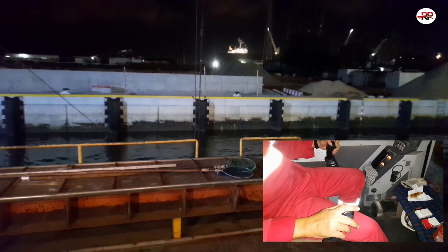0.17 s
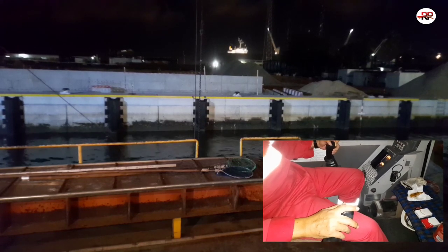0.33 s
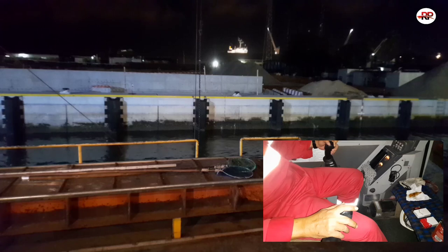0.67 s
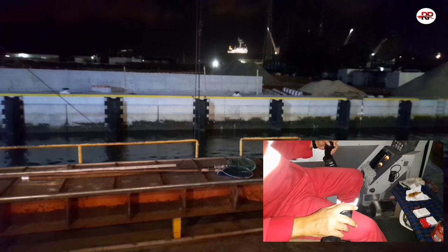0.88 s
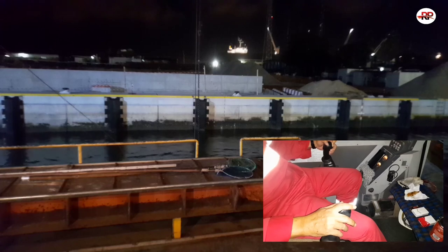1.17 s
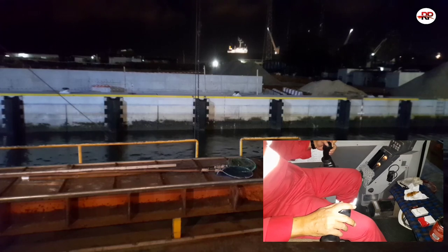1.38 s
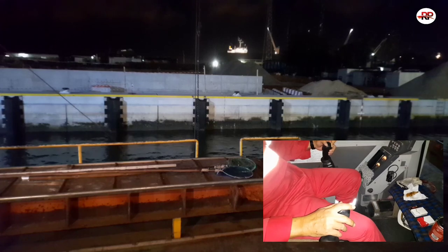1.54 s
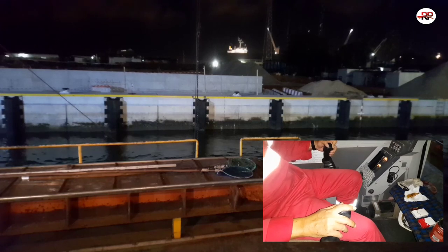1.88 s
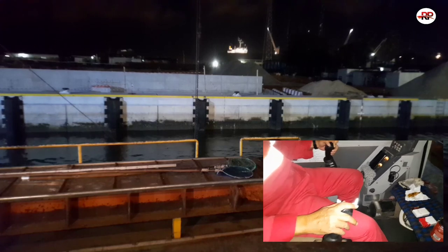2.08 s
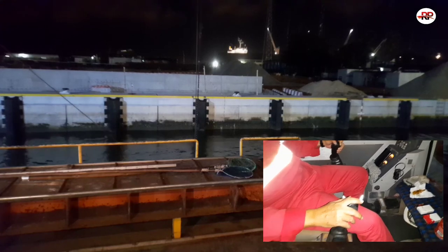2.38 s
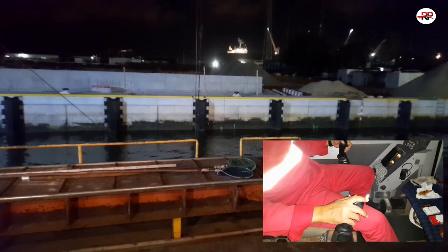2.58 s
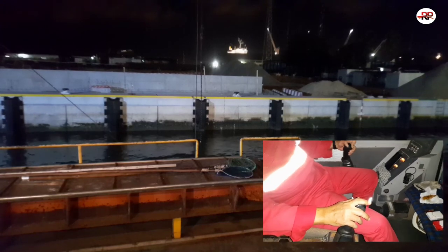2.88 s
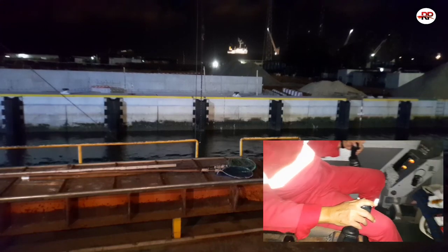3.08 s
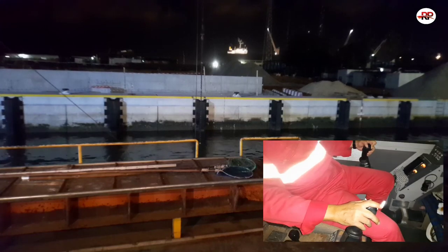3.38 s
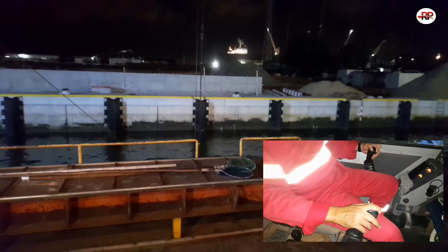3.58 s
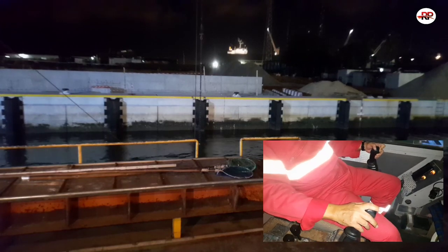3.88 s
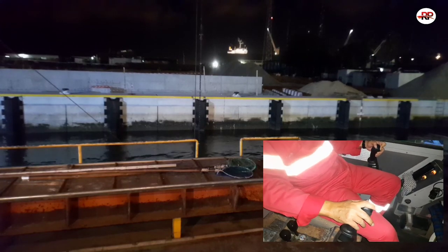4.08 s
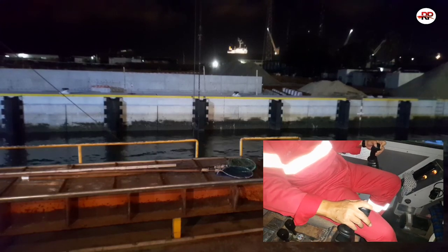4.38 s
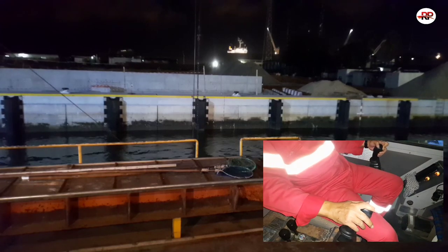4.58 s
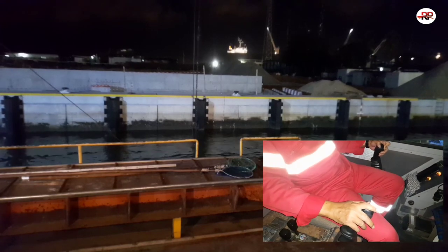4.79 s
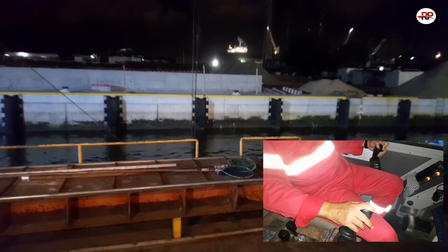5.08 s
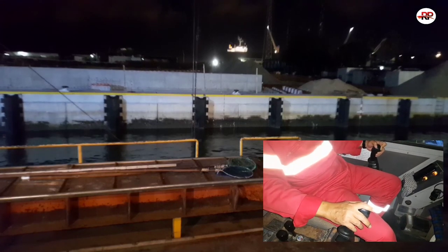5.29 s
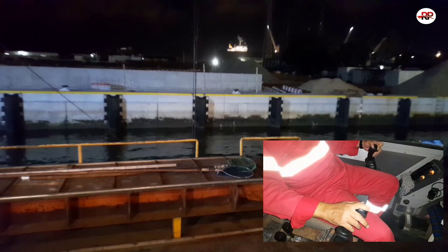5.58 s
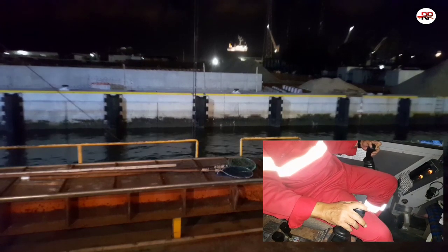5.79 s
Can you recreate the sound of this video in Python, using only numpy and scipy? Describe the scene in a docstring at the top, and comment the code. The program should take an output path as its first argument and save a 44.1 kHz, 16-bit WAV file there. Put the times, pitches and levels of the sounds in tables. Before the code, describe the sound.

Close inside a crane operator's cab, a diesel drones at constant speed with a steady mid-pitched whine above it. Low booms throb unevenly several times a second, panels hum, and faint oil hiss and light ticks come and go. After about four seconds the hydraulics take load: the drive drops in pitch, its deep throb quickens, and valves hiss, squeal and chirp to the end.

```python
"""The diesel of a dredging crane, heard from its cab, runs at governed speed: sines at orders of its cycle form
a drone. A geared pump whines over it, and a hydraulic drive and a deep hum beat with its orders; a fan adds a
thin tone. The cab booms in uneven throbs and steady tones sing in it; filtered noise gives rumble, clatter, oil
hiss and a few light ticks. Late on the load comes: the drive sinks in pitch and booms, the deep throb quickens,
and oil hisses, squeals and chirps through the valves."""
import sys
import numpy as np
from scipy import signal
from scipy.fft import rfft, irfft, next_fast_len
from scipy.io import wavfile

SR = 44100
rng = np.random.default_rng(int(sys.argv[2]) if len(sys.argv) > 2 else 0)


def dump(signal):
    """Clip the signal to [-1, 1] and save it as 16-bit WAV at the path in sys.argv[1]."""
    limited = np.clip(np.atleast_2d(signal).T, -1, 1)
    pcm = np.round(limited * 32767).astype(np.int16)
    wavfile.write(sys.argv[1], SR, pcm)


N = 261954
TIME = np.arange(N) / SR

CYCLE_HZ = 18.963   # repeat rate of the engine's drone, before the governor acts
HIGHEST_IN_STEP = 10   # multiple of the cycle; orders above it start at a random phase
LOAD_ON_S, LOAD_RISE_S = 4.33, 0.16   # the hydraulics take the load
LULL_S, LULL_HALF_S, LULL_DB = 3.28, .17, -0.5   # the deepest order of the drone dips briefly
PUMP_ORDER = 27   # multiple of the engine cycle
PUMP_DB, PUMP_LOADED_DB = -31.5, -33.5   # mean whine, running light and under load
FAN_HZ = 983.5   # mean blade rate
CLATTER_TOP_HZ = 5970
FLOW_DB, FLOW_LOADED_DB = -59, -57   # steady oil hiss, running light and under load
SNAP_S, SNAP_DB, SNAP_T60_S = 3.47, -42, .004   # the loudest tick snaps home
CUTOFF_HZ = 14500

# Engine orders. Each row: multiple of the cycle, level in dB before the drone trim,
# left-right difference in dB, left lead in rad.
ENGINE_ORDERS = [(3, -32.8, -1, 0), (4.5, -42, 3, .1), (6, -37, 0, .6), (7, -40, 0, -.2), (8, -32.5, 0, .1),
                 (9, -31, -2, 1.0), (10, -36, 1, 0), (12, -41, 8, 1.4), (14, -45, 3, -.2), (15, -48, 1, 0),
                 (17, -45, 3, -.1), (18, -40, 3, .1), (24, -51, -5, -1.3), (26, -53, 1, .6),
                 (28, -50, 0, -.6), (32, -55, 0, 0), (33, -53, -5, .2), (36, -55, 3, -.7),
                 (45, -49.5, -5, .6), (54, -56, 1, -.5), (63, -62, 1, 1.5)]
# Engine orders that change under load. Each row: multiple of the cycle, dB added.
LOADED_ORDERS = [(18, -5), (24, 5.5), (26, 10), (32, 4), (33, -2.5), (54, -6.5)]
# Speed of the hydraulic drive. Each row: time in seconds, speed in Hz before the governor acts.
DRIVE_SPEED = [(0.0, 56.08), (0.51, 55.08), (0.96, 52.57), (1.74, 55.28), (1.87, 53.6), (2.19, 56.57),
               (2.51, 52.88), (3.02, 56.15), (3.19, 52.13), (3.36, 55.64), (3.88, 52.42), (4.24, 55.28),
               (4.35, 50.1), (4.87, 49.49), (5.36, 48.97), (5.64, 47.8), (5.75, 49.9), (5.94, 49.63)]
# Its harmonics. Each row: multiple of the speed, base level in dB running light, base level in dB under load.
DRIVE_ORDERS = [(2, -28.5, -32), (3, -28.5, -21.5), (4, -38, -33), (5, -43, -35), (6, -47.5, -47),
                (7, -49, -49), (8, -65, -47.5)]
# Swell of its two booming harmonics. Each row: time in seconds, dB added to the second, dB added to the third.
DRIVE_SWELL = [(0, -5.5, 2), (.3, 6, -1), (.47, -17, -3), (.65, 6, 0.5), (.88, 0.5, -5), (1.15, 2, -14),
               (1.33, 4.5, -6), (1.55, 2.5, -7), (1.85, -1.5, -10.5), (2.2, 0.5, -2), (2.47, 4.5, -4),
               (2.62, -8, 0), (2.82, 3, 4), (2.96, 1.5, -5), (3.12, 4.5, -4), (3.6, 10, -12.5),
               (3.73, -1.5, 3), (3.88, 0.5, -3), (4.2, 3.5, -6), (4.33, 6.5, 1.5), (4.45, -2, 2.5),
               (4.56, 5, 3.5), (4.72, 8.5, 1.5), (5.1, 6.5, 2.5), (5.42, -2, -2.5), (5.68, 7, 0),
               (5.84, -5, 4), (5.94, -8, 4.5)]
# The next two take turns under load. Each row: time in seconds, dB added to the fourth, dB added to the fifth.
DRIVE_LOADED_SWELL = [(4.35, -3, -5), (4.7, -1, 6), (5.0, 7.5, -6.5), (5.11, -7, 1), (5.27, -9, 6.5),
                      (5.45, 9.5, 4), (5.58, 2.5, -12), (5.78, -3, 2.5), (5.94, -10, -3)]
# Deep hum under the engine's third order. Each row: time in seconds, pitch in Hz before the governor, level in dB.
DEEP_HUM = [(0.0, 53.8, -29), (0.55, 52.88, -36), (2.44, 52.77, -34.5), (2.59, 53.78, -29),
            (3.1, 52.27, -50), (3.75, 52.59, -35), (4.3, 55.08, -26), (4.4, 50.93, -33),
            (4.71, 50.77, -30.5), (5.48, 49.14, -28.5), (5.94, 48.8, -28.5)]
# Booms of the cab while the drive runs light. Each row: centre in seconds, pitch in Hz, level in dB,
# half length in seconds.
THROBS = [(0.154, 158.5, -16.5, 0.043), (0.285, 159, -19, 0.047), (0.447, 158.9, -14.5, 0.028),
          (0.573, 157, -24.5, 0.047), (0.839, 161.9, -19, 0.037), (0.988, 153.4, -18, 0.045),
          (1.104, 159, -16.5, 0.034), (1.226, 150.7, -21, 0.024), (1.56, 161.7, -22, 0.071),
          (1.721, 161.5, -22.5, 0.021), (1.803, 152.2, -17, 0.028), (1.879, 162.3, -23.5, 0.02),
          (2.031, 158.8, -22, 0.031), (2.22, 166.3, -19.5, 0.041), (2.333, 149.9, -21, 0.03),
          (2.42, 155.9, -23, 0.026), (2.585, 159, -16, 0.035), (2.76, 155.8, -18.5, 0.04),
          (3.01, 161, -17.5, 0.051), (3.117, 156.9, -20, 0.038), (3.37, 160.2, -24, .04),
          (3.851, 155.9, -19, 0.039), (3.991, 157.3, -20, 0.047), (4.122, 165, -25, .03)]
# Steady tones in the cab, wavering in pitch and level. Each row: mean pitch in Hz, level in dB running light,
# level in dB under load, # both before trim and swell.
CAB_TONES = [(191.9, -38, -38), (216.4, -35.5, -45.5), (245.5, -40.5, -38.5), (267.5, -38.5, -46),
             (286.3, -41, -40.5), (324.3, -42, -43), (382.3, -49, -47), (412, -59, -42.5), (826, -55.5, -54.5),
             (928, -62.5, -59), (1084, -59.5, -59), (1390, -62.5, -65), (1779, -69, -72)]
# Fan blade rate and octave. Each row: multiple, mean level in dB running light, mean level in dB under load,
# left-right difference in dB, left lead in rad.
FAN_TONES = [(1, -47.5, -47.5, -1.5, 0.051), (2, -60.5, -63.5, -11.5, 1.9)]
# Moments when a valve opens wider. Each row: centre in seconds, Gaussian spread in seconds, hiss level in dB.
RUSHES = [(.1, .08, -69), (0.653, 0.12, -62), (1.116, .08, -64), (1.8, 0.25, -65.5), (2.352, 0.17, -59.5),
          (4.69, 0.035, -59.5), (5.27, .07, -57), (5.361, .22, -59.5)]
# Narrow squeals of the valves under load. Each row: centre in Hz, width in Hz, mean level in dB against the hiss.
WHISTLES = [(1567, 270, -5.5), (2565, 180, -6.5), (2970, 170, -9.5), (3260, 190, -16), (3600, 350, -14.5),
            (4050, 400, -12), (4770, 70, -18), (5500, 350, -15.5), (6100, 300, -18)]
# Swell of the ragged squeal, strongest where the valve opens widest. Each row: time in seconds, dB before trim.
SQUEAL_SWELL = [(4.33, -90), (4.42, -67), (4.68, -64), (4.78, -67), (5.0, -65.5), (5.15, -63),
                (5.31, -55.5), (5.43, -57), (5.55, -61.5), (5.7, -64), (5.94, -68)]
# Its partials. Each row: mean pitch in Hz, level in dB against the swell.
SQUEAL_PARTIALS = [(2580, -3), (2900, -5), (3080, -6), (3290, -4), (3480, -5.5), (3700, -5), (4000, -9),
                   (4950, -12.5), (5600, -12), (5990, -12.5)]
# Squeaks, most of them under load. Each row: centre in seconds, pitch in Hz, level in dB,
# level of the octave in dB (both before trim and rasp), half length in seconds.
SQUEAKS = [(.1, 3150, -75, -66, 0.023), (0.476, 2190, -72, -61, .016), (0.484, 2410, -70, -59, .017),
           (1.68, 2460, -72, -64, .02), (1.829, 2800, -68, -62, .013), (2.322, 2775, -70, -61, .025),
           (4.375, 2455, -65, -63, 0.023), (4.466, 2460, -60, -57, .026), (4.581, 2465, -54, -62, 0.024),
           (4.648, 2551, -55, -58, .018), (4.705, 3070, -59, -64, .028), (4.83, 2480, -53, -62, 0.021),
           (4.873, 2970, -57, -61, .028), (4.948, 2600, -54.5, -65, 0.027), (5.016, 2822, -58, -61, 0.025),
           (5.075, 3280, -60, -68, 0.021), (5.11, 2820, -56, -58, .025), (5.248, 2530, -52, -60, .026),
           (5.3, 3100, -57, -64, 0.021), (5.35, 2610, -56, -71, .018), (5.425, 2570, -59, -66, .018),
           (5.491, 2930, -58, -66, .025), (5.568, 2642, -52.5, -68, 0.02), (5.835, 2535, -55, -70, .018)]
# Ticks in the cab. Each row: start in seconds, level in dB, decay by 60 dB in seconds.
TICKS = [(.583, -57, .05), (3.262, -57, .08), (3.379, -55, .05), (3.385, -56, .12), (3.462, -54, .07),
         (3.4695, -51.5, .06), (3.868, -59, .12)]
# Noise colours of rumble and clatter. Each row: frequency in Hz, density in dB per Hz.
RUMBLE = [(22, -74.5), (35, -68.5), (46, -58), (65, -48.5), (80, -51), (96, -43), (112, -45.5),
          (126, -51.5), (146, -43.5), (170, -43.5), (205, -54), (275, -53.5), (335, -56.5), (360, -60),
          (395, -56.5), (470, -82), (700, -100), (2000, -130)]
CLATTER = [(250, -95), (450, -61.5), (620, -62), (750, -67), (1050, -67.5), (1300, -73.5), (1600, -82.5),
           (2100, -81.5), (2600, -88.5), (3100, -93.5), (4200, -93.5), (7000, -108)]
# Noise colours of hiss and ticks, whose level is set elsewhere. Each row: frequency in Hz, relative density in dB.
HISS = [(1500, -10), (2700, 0), (3300, 0.5), (4500, -1), (6300, 1.2), (7400, -3.5), (8500, -6), (9700, 0),
        (12000, -2.5), (14500, -10.5)]
TICK_COLOUR = [(1000, 1), (3200, 4), (6000, 5), (9000, 2), (12000, 10), (14500, 9)]
# Correlation of the two sides in noise. Each row: frequency in Hz, left-right likeness from 0 to 1.
LIKENESS = [(30, 0.99), (55, 1), (110, 0.87), (200, 0.81), (380, 0.58), (690, 0.27), (1280, 0),
            (2400, 0.037), (14000, 0.0082)]
# Balance of the two sides in noise. Each row: frequency in Hz, left-right difference in dB.
BALANCE_DB = [(60, 0.2), (300, 2), (700, -2), (1300, -2.5), (4500, 0), (9000, -3), (13000, 3.5)]


def from_db(db):
    """A level in decibels is twenty times the logarithm of the gain."""
    return 10 ** (np.asarray(db) / 20)


def rms_one(x):
    """Division by the root mean square gives unit effective value."""
    return x / np.sqrt(np.mean(x ** 2) + 1e-20)


def under(load, light, loaded):
    """Linear transition from the value running light to the value under load."""
    return light * (1 - load) + loaded * load


def in_time(rows):
    """Linear interpolation in time of each column after the first."""
    s, *columns = np.transpose(rows)
    return [np.interp(TIME, s, c) for c in columns]


def at_hz(points, hz):
    """Linear interpolation of a spectrum on a log-frequency axis."""
    f, value = np.transpose(points)
    return np.interp(np.log(hz + 1e-9), np.log(f), value)


def drift(rate):
    """Random modulation of unit rms: sparse noise through a double one-pole low-pass at rate Hz."""
    step, settling = 40, 2000   # samples per noise value; values discarded
    r = np.exp(-2 * np.pi * rate * step / SR)
    sparse = rng.standard_normal(N // step + settling + 2)
    slow = signal.lfilter([1], [1, -2 * r, r * r], sparse)[settling:]
    return np.interp(np.arange(N) / step, np.arange(len(slow)), rms_one(slow))


def noise(colour):
    """Partial correlation: shared and opposed noise make two sides that agree in the bass and part in the treble."""
    size = next_fast_len(N, real=True)
    hz = np.fft.rfftfreq(size, 1 / SR)
    mid, side = rfft(rng.standard_normal((2, size)))
    alike = np.clip(at_hz(LIKENESS, hz), -1, 1)
    signs = np.array([[1], [-1]])   # left, right
    pair = np.sqrt(1 + alike) * mid + np.sqrt(1 - alike) * side * signs
    gain = from_db(at_hz(colour, hz) + signs * at_hz(BALANCE_DB, hz) / 2)
    return irfft(pair * gain, size)[:, :N] * np.sqrt(SR) / 2


def narrow_noise(low_hz, high_hz):
    """Band-pass filtering of noise, independent at the two sides, to unit rms."""
    band = signal.butter(2, [low_hz, high_hz], "band", fs=SR, output="sos")
    return rms_one(signal.sosfilt(band, rng.standard_normal((2, N))))


def turning(hz):
    """Phase is the time integral of angular frequency."""
    return 2 * np.pi * np.cumsum(hz) / SR


def tone(angle, level_db, pan_db, lead):
    """Standing waves in the cab give a sine its own level and phase at each side."""
    left = from_db(pan_db / 2) * np.sin(angle + lead)
    right = from_db(-pan_db / 2) * np.sin(angle)
    return np.sqrt(2) * from_db(level_db) * np.array([left, right])


def engine(cycle, load, waver_db=3.0, drone_db=-1.5, upper_waver_db=1.5, deepest_waver_db=1.0):
    """Periodic combustion radiates whole and half orders; each wavers, the upper ones less and out of step."""
    out = 0
    added_db = {round(order): db for order, db in LOADED_ORDERS}
    lull_db = LULL_DB * np.exp(-((TIME - LULL_S) / LULL_HALF_S) ** 2)
    for order, level_db, pan_db, lead in ENGINE_ORDERS:
        deepest = order == ENGINE_ORDERS[0][0]
        upper = order > HIGHEST_IN_STEP
        spread_db = deepest_waver_db if deepest else upper_waver_db if upper else waver_db
        change_db = spread_db * drift(2.1) + load * added_db.get(order, 0) + deepest * lull_db
        angle = order * cycle + upper * rng.uniform(0, 2 * np.pi)
        out = out + tone(angle, level_db + drone_db + change_db, pan_db, lead)
    return out


def engine_noise(cycle, depth=0.087):
    """Structure-borne rumble, and combustion clatter modulated by the cycle and low-passed by the cab walls."""
    firings = np.cos(6 * cycle)
    pulse = 1 + depth * (np.cos(cycle) + firings)
    walls = signal.butter(4, CLATTER_TOP_HZ, fs=SR, output="sos")
    return noise(RUMBLE) + signal.sosfilt(walls, pulse * noise(CLATTER))


def pump(cycle, load, ripple=0.064, waver_db=1.1):
    """Gearing locks the pump whine to the engine; it ripples once a cycle and softens under load."""
    level_db = under(load, PUMP_DB, PUMP_LOADED_DB) + waver_db * drift(3.2)
    return (1 + ripple * np.cos(cycle)) * tone(PUMP_ORDER * cycle, level_db, pan_db=0.8, lead=-0.73)


def drive(governor, load, wobble_rad=0.13, waver_db=2.0, steadying=.45):
    """Pressure ripple is harmonic in the drive's speed; load steadies it and brings out its third harmonic."""
    out = 0
    unrest = 1 - steadying * load
    angle = turning(governor * in_time(DRIVE_SPEED)[0]) + wobble_rad * unrest * drift(6.9)
    swell_db = dict(enumerate(in_time(DRIVE_SWELL) + in_time(DRIVE_LOADED_SWELL), start=2))
    for order, light_db, loaded_db in DRIVE_ORDERS:
        order = round(order)
        change_db = swell_db.get(order, 0) + waver_db * unrest * drift(2.5)
        out = out + tone(order * angle, under(load, light_db, loaded_db) + change_db, pan_db=1.0, lead=-0.18)
    return out


def deep_hum(governor, pan_db=-0.5):
    """Beating: a deep hum close in frequency to the engine's third order throbs against it."""
    hz, level_db = in_time(DEEP_HUM)
    return tone(turning(governor * hz), level_db, pan_db, lead=0)


def throbs(pan_db=2.0, lead=.1):
    """Amplitude modulation: the cab's boom swells and falls several times a second, each time at another pitch."""
    swells = sum(from_db(level_db) * np.exp(-((TIME - s) / half_s) ** 2) for s, _, level_db, half_s in THROBS)
    return swells * tone(turning(in_time(THROBS)[0]), 0, pan_db, lead)


def cab_tones(load, wander_hz=3.033, swell_db=5.0, trim_db=-2.0, pan_db=2.0):
    """Slow random modulation: each tone sings in wavering swells, and the load changes which of them sing most."""
    out = 0
    for hz, light_db, loaded_db in CAB_TONES:
        angle = turning(hz + wander_hz * drift(4.05))
        level_db = under(load, light_db, loaded_db) + trim_db + swell_db * np.minimum(drift(5.5), 1.5)
        out = out + tone(angle, level_db, pan_db, lead=.5 * drift(2.1))
    return out


def oil_flow(load, flutter_db=0.76):
    """Independent noise powers add: the hiss rises with load, swells as a valve opens wider, and flutters."""
    steady = from_db(under(load, FLOW_DB, FLOW_LOADED_DB))
    rushes = [from_db(level_db) * np.exp(-((TIME - s) / spread_s) ** 2 / 2) for s, spread_s, level_db in RUSHES]
    return np.sqrt(steady ** 2 + np.sum(np.square(rushes), axis=0)) * from_db(flutter_db * drift(10.0))


def valves(load, flicker_db=3.0):
    """Turbulent flow is broadband noise; under load the oil rushes harder and narrow bands squeal in ragged patches."""
    squeals = 0
    for hz, width, level_db in WHISTLES:
        flicker = from_db(level_db + flicker_db * np.minimum(drift(11), 1.5))
        squeals = squeals + flicker * narrow_noise(hz - width / 2, hz + width / 2)
    return oil_flow(load) * (rms_one(noise(HISS)) + load * squeals)


def squeal(catch_db=5.0, trim_db=-3.5):
    """Frequency modulation roughens a continuous squeal of close partials that wander, catch and drop out."""
    jitter, wander = .009, .011   # fractions of the pitch
    out = 0
    for hz, level_db in SQUEAL_PARTIALS:
        angle = turning(hz * (1 + wander * drift(9) + jitter * drift(160)))
        caught_db = level_db + catch_db * np.minimum(drift(14), 1.3)
        out = out + tone(angle, caught_db, pan_db=0.5, lead=2 * drift(30))
    return from_db(in_time(SQUEAL_SWELL)[0] + trim_db) * out


def squeaks(climb_per_s=.1, trim_db=0.7, rasp_db=2.5):
    """Random modulation rasps short chirps and their octave, bending upwards, as from a valve or a rope in its sheave."""
    out = np.zeros((2, N))
    jitter = .014   # fraction of the pitch
    roughness = jitter * np.array([drift(150), drift(150)])
    rasp = from_db(rasp_db * np.minimum(drift(70), 1.5))
    for s, hz, level_db, octave_db, half_s in SQUEAKS:
        near = np.abs(TIME - s) < 4 * half_s
        t = TIME[near] - s
        angle = np.array([turning(hz * (1 + climb_per_s * t + side[near])) for side in roughness])
        chirp = from_db(level_db) * np.sin(angle) + from_db(octave_db) * np.sin(2 * angle)
        out[:, near] += chirp / np.cosh(1.7 * t / half_s)
    return np.sqrt(2) * from_db(trim_db) * rasp * out


def fan(load, wander_hz=0.14, flutter_db=0.4):
    """Blade passing gives a thin tone and its octave, fluttering in the air stream; load weakens the octave."""
    out = 0
    angle = turning(FAN_HZ + wander_hz * drift(2.0))
    for order, light_db, loaded_db, pan_db, lead in FAN_TONES:
        level_db = under(load, light_db, loaded_db) + flutter_db * drift(17)
        out = out + tone(round(order) * angle, level_db, pan_db, lead)
    return out


def ticks(pan_db=3.0):
    """Exponential decay: light, bright contacts, a little to the left, die quickly in the small cab."""
    fade = 0
    for s, level_db, t60 in [*TICKS, (SNAP_S, SNAP_DB, SNAP_T60_S)]:
        fade = fade + (TIME >= s) * from_db(level_db - 60 * np.clip(TIME - s, 0, 1) / t60)
    return fade * rms_one(noise(TICK_COLOUR)) * from_db([[pan_db / 2], [-pan_db / 2]])


def scene(hunt=0.00072, sag=0.00318):
    """Speed regulation: the governor hunts slightly and sags for a moment as the load comes on; sources add."""
    load = np.clip((TIME - LOAD_ON_S) / LOAD_RISE_S, 0, 1)
    # the load less its own slow average: a sag that recovers with a time constant of half a second
    surge = load - signal.lfilter([2 / SR], [1, 2 / SR - 1], load)
    governor = 1 + hunt * drift(2.23) - sag * surge
    cycle = turning(CYCLE_HZ * governor)
    machinery = engine(cycle, load) + engine_noise(cycle) + pump(cycle, load) + drive(governor, load)
    cab = deep_hum(governor) + throbs() + cab_tones(load)
    oil = valves(load) + squeal() + squeaks()
    return machinery + cab + oil + fan(load) + ticks()


def record(dry):
    """Band limitation: the top is cut steeply, and the sound eases in and out over a few milliseconds."""
    edges = signal.windows.tukey(N, .012 * SR / N)   # 6 ms at each end
    top_cut = signal.ellip(10, .1, 80, CUTOFF_HZ, fs=SR, output="sos")
    return signal.sosfilt(top_cut, edges * dry)


dry = scene()
out = record(dry)
dump(out)
```